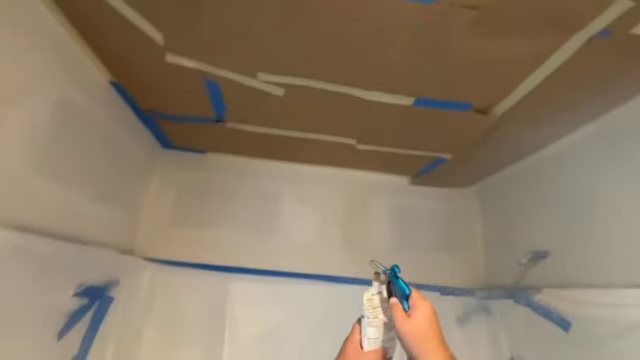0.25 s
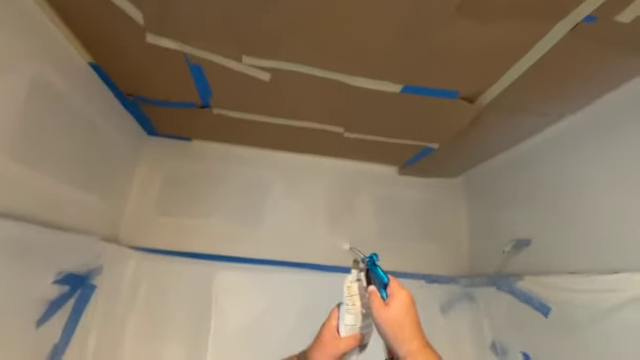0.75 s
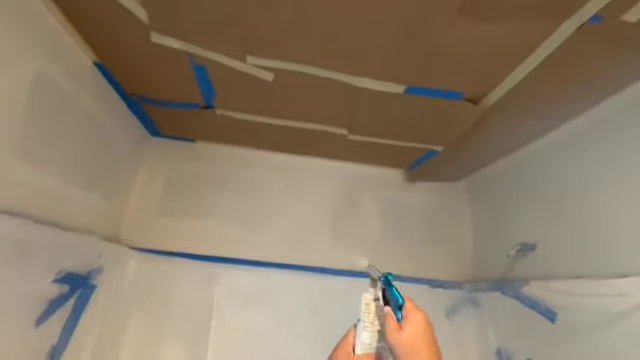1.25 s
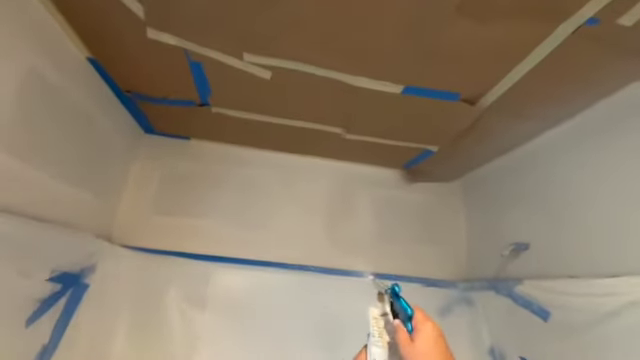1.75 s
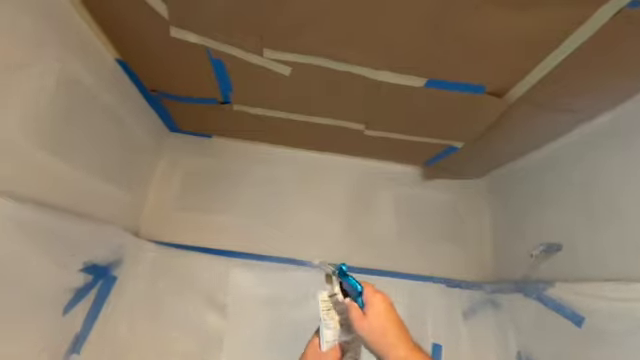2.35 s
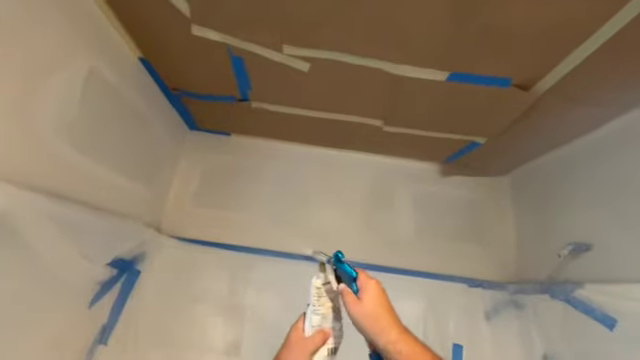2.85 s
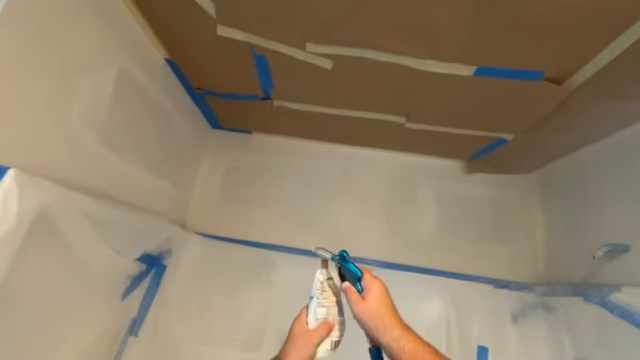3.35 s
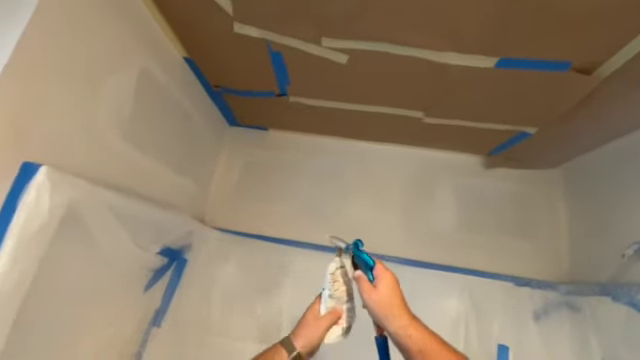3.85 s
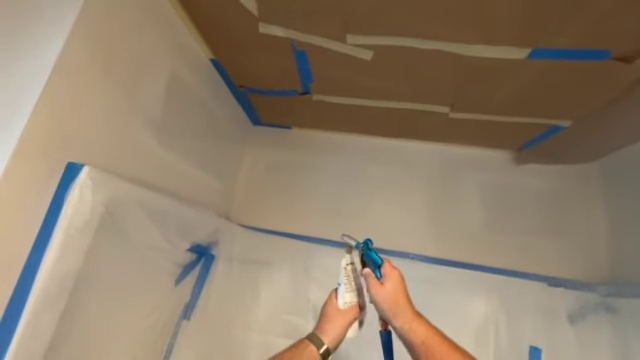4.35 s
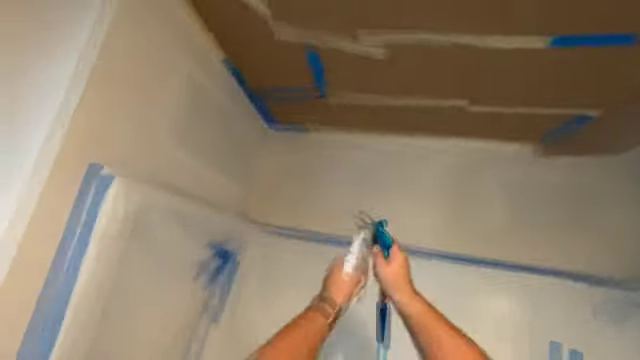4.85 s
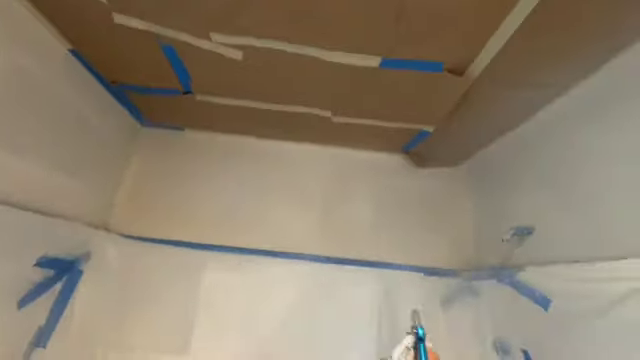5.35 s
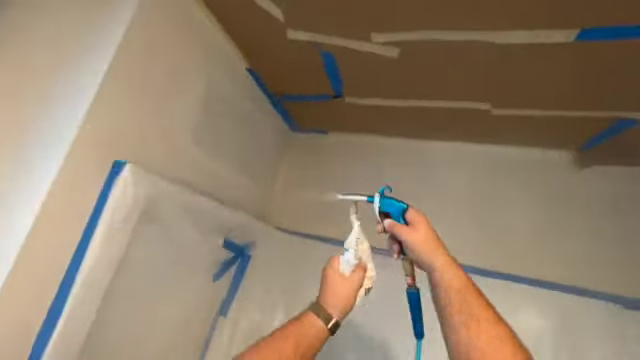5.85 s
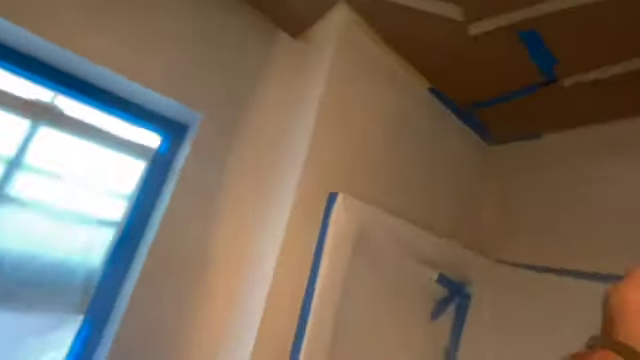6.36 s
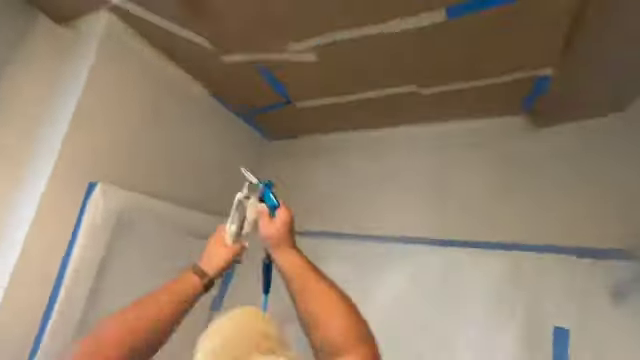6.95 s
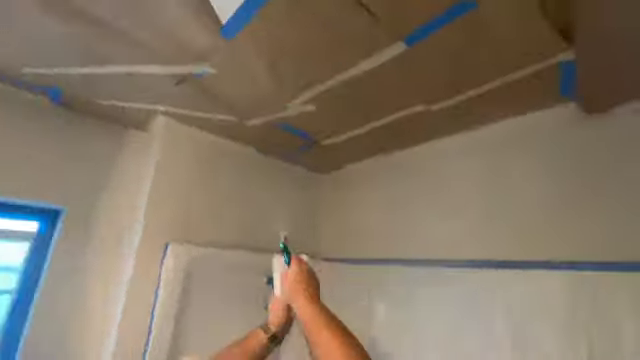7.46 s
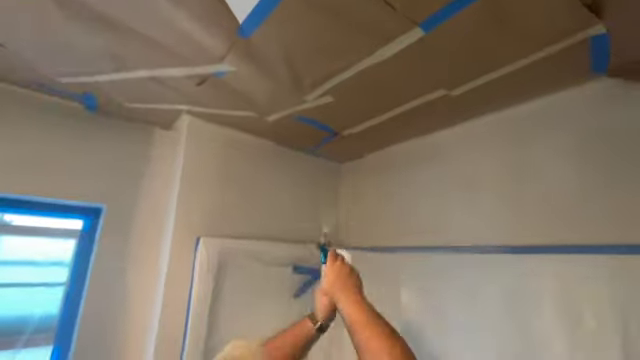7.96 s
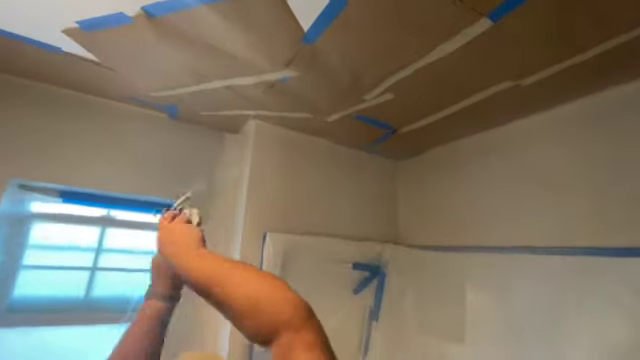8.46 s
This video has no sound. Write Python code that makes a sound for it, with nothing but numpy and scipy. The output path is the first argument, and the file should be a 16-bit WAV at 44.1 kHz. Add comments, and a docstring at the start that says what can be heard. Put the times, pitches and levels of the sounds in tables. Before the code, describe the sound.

Low compressor drone in a small bare room, then a loud wet spray blast with rasping spits, dissolving around five seconds into thin quiet hiss.

```python
"""In a small bare room a compressor drones from the start: unsteady crank partials over a noise rattle.
The air gun's trigger first leaks dull noise, then opens fully and blows wall texture: a bright jet of
noise, wet rasping spits and tiny ticks. Gain control clamps down on this blast and pushes the drone under it.
Around 5 s it all dissolves into the same work as if sped up about sevenfold: a thin, quiet noise hiss
with passing resonances over a steady rattle and a faint whine of sines; later the listening place moves."""
import sys
import numpy as np
from scipy import signal
from scipy.fft import rfft, irfft
from scipy.io import wavfile
from scipy.ndimage import uniform_filter1d

SR = 44100
rng = np.random.default_rng(int(sys.argv[2]) if len(sys.argv) > 2 else 0)


def materialize(psi):
    """Save the field psi as 16-bit PCM at rate SR to the path in sys.argv[1].

    A 1-D psi becomes a single channel; in a 2-D psi each row is a channel.
    """
    bounded = np.clip(np.atleast_2d(psi).T, -1, 1)
    quanta = np.round(bounded * 32767).astype(np.int16)
    wavfile.write(sys.argv[1], SR, quanta)


N = 384111

SIZE, HOP = 2048, 512  # short-time spectra, in samples
TIME = np.arange(N) / SR
FRAME_S = np.arange(N // HOP + 5) * HOP / SR
BIN_HZ = np.fft.rfftfreq(SIZE, 1 / SR)
FAST = 6.9  # how many times faster the sped-up work goes
DISSOLVE_START_S, DISSOLVE_END_S = 4.566, 5.19


def gain_of(db):
    """Decibels to amplitude."""
    return 10 ** (np.asarray(db) / 20)


def evened(x):
    """Scales to rms 1."""
    return x / np.sqrt(np.mean(x ** 2) + 1e-20)


def ramp(t, start_s, length_s):
    """Goes from 0 to 1 in a straight line."""
    return np.clip((t - start_s) / length_s, 0, 1)


def across(rows):
    """Reads every column of a colour table at each frequency bin, along a log-frequency axis."""
    hz, *columns = np.transpose(rows)
    return [np.interp(np.log(BIN_HZ + 1), np.log(hz), column) for column in columns]


def bump(centre_hz, octaves):
    """A bell on the log-frequency axis."""
    return np.exp(-.5 * (np.log2((BIN_HZ + 1) / centre_hz) / octaves) ** 2)


def lag(x, seconds):
    """One-pole smoothing."""
    r = np.exp(-1 / (seconds * SR))
    return signal.lfilter([1 - r], [1, -r], x)


def drift(rate):
    """Slow random wandering of rms 1, up to about the given rate in Hz."""
    hz = np.fft.rfftfreq(N, 1 / SR)
    slow = rfft(rng.standard_normal(N)) / (1 + (hz / rate) ** 4)
    return evened(irfft(slow, N))


def chance():
    """Random short-time spectra of power 1."""
    a, b = rng.standard_normal((2, len(FRAME_S), len(BIN_HZ)))
    return (a + 1j * b) / np.sqrt(2)


def flicker(count, size):
    """Random patches of rms 1, count frames long and size bins wide."""
    patches = rng.standard_normal((len(FRAME_S), len(BIN_HZ)))
    longer = uniform_filter1d(patches, count, 0)
    return evened(uniform_filter1d(longer, size, 1))


def paired(left, other, likeness):
    """Two channels with a given likeness."""
    same = np.clip(likeness, -1, 1)
    return np.array([left, same * left + np.sqrt(1 - same ** 2) * other])


def noise(field_db, likeness, balance_db, walls=np.zeros((2, 1, len(BIN_HZ))), early_share=0):
    """One noise source reaches left and right through early echoes; the rest is diffuse room sound."""
    early = chance() * paired(*walls, likeness)
    diffuse = paired(chance(), chance(), likeness)
    z = np.sqrt(early_share) * early + np.sqrt(1 - early_share) * diffuse
    lean = gain_of(balance_db) * np.ones(len(BIN_HZ))
    sides = np.array([lean, np.ones(len(BIN_HZ))]) / np.sqrt(1 + lean ** 2)
    z = z * sides[:, None] * gain_of(field_db)
    sound = signal.istft(z, nperseg=SIZE, noverlap=SIZE - HOP, time_axis=1, freq_axis=2)[1]
    return evened(sound[:, :N])


def echoes(longest_s, sway_s, rate, count):
    """Echoes off the bare walls comb the spectrum; the combs slide as the gun moves."""
    total = 0
    for place, speed, start, turn in rng.random((count, 4)):
        sway = np.sin(2 * np.pi * (rate * (.5 + speed) * FRAME_S + start))
        delay = longest_s * (.06 + place) + sway_s * sway
        angle = (2 * np.pi * (delay[:, None] * BIN_HZ + turn)).astype(np.float32)
        total = total + np.cos(angle) + 1j * np.sin(angle)
    return total / np.sqrt(count)


# Hollow resonances between jet, hands and corner that come, slide and go with the aim.
# A level below 0 is a cancellation.
# Columns: [start t/s, end t/s, first f/Hz, last f/Hz, level/dB]
HOLLOW_RESONANCES = [(.2, 1.7, 1150, 1216, 2), (.2, 2.27, 1503, 1465, 7), (.5, 2.7, 1880, 1915, 3),
                     (.4, 1.5, 540, 563, 4), (.2, 2.2, 3400, 3430, 4.5), (.2, 1.2, 4570, 4640, 6),
                     (1.0, 2.17, 2300, 2310, 4.5), (.2, 3.1, 6520, 6500, 9), (.2, 0.81, 9350, 9320, 7),
                     (2.0, 3.42, 1200, 1225, 9), (2.1, 2.54, 2400, 2325, 9), (1.798, 3.4, 6500, 6800, -3),
                     (2.25, 2.88, 3710, 3620, 7), (2.5, 3.65, 10400, 11700, 5.5), (2.9, 4.5, 2215, 2265, 9),
                     (3.05, 4.6, 3260, 3240, -2), (3.4, 4.08, 3730, 3740, 6.5), (3.0, 4.2, 1740, 1790, 3),
                     (3.15, 4.95, 1392, 1415, 9), (3.3, 4.9, 1260, 1270, -4.5), (3.9, 4.44, 2600, 2560, -4),
                     (4.0, 5.1, 2700, 2760, 1.5), (4.3, 5.1, 1110, 1080, 8), (4.3, 5.2, 10300, 10200, 5),
                     (5.4, 6.8, 3060, 3080, 5), (7.0, 11, 3830, 3860, 0), (7.2, 7.1, 10150, 10200, 7),
                     (7.3, 8.9, 13400, 13270, 5.5)]


def hollows(width_hz, fade_s, widening, flutter, wander):
    """Lift in dB from the passing resonances; they swell and wander with the unsteady hands."""
    lift_db = 0
    for start, end, first_hz, last_hz, db in HOLLOW_RESONANCES:
        wobble = rng.standard_normal((2, len(FRAME_S)))
        swell, sway = evened(uniform_filter1d(wobble, size=7, axis=1))
        inside_s = np.minimum(FRAME_S - start, end - FRAME_S)
        present = ramp(inside_s, 0, fade_s) * (1 + flutter * swell)
        glide_hz = np.interp(FRAME_S, [start, end], [first_hz, last_hz])
        hz = (glide_hz * (1 + wander * sway))[:, None]
        lift_db = lift_db + db * present[:, None] / (1 + (2 * (BIN_HZ - hz) / (width_hz + widening * hz)) ** 2)
    return lift_db


def partial(hz, db, phase, turn):
    """A machine partial: a sine that reaches left and right out of step by turn radians."""
    cycles = hz * TIME + rng.random()
    return np.sqrt(2) * gain_of(db) * np.sin(2 * np.pi * cycles + phase + np.array([[0], [turn]]))


# The compressor's hum on the multiples of its crank speed, before the common level DRONE_DB.
# Columns: [multiple of the crank speed, level/dB]
CRANK_PARTIALS = [(1, -33), (2, -36), (3, -25), (4, 2), (5, -21), (6, -11.5), (7, -22), (8, -18), (9, -11),
                  (10, -28), (11, -31), (12, -30), (13, -24), (14, -18), (15, -14), (16, -2), (17, -22),
                  (18, -13), (19, -14.5), (20, -11), (21, -12), (22, -6.5), (23, -16), (24, -30), (25, -20),
                  (26, -17.5), (27, -21), (28, -17.5), (29, -34), (30, -29), (31, -27), (32, -12.5),
                  (33, -12), (34, -23)]
# Standing waves lean the hum to one side.
# Columns: [f/Hz, left-right level/dB]
HUM_LEAN = [(53, 4), (80, 2), (120, -12), (212, -3), (290, -0.5), (435, -6.5)]
# Colour of the compressor's rattle, before its top and bottom are cut further.
# Columns: [f/Hz, relative level per Hz/dB]
RATTLE_COLOUR = [(18, -34), (30, -11), (60, -12), (81, -5), (124, -2), (153, -30), (215, -6.5), (293, -2),
                 (330, -20), (442, -7), (515, -14.5), (819, -18.5), (971, -17), (1800, -27.5), (2340, -58),
                 (3960, -115)]
CRANK_HZ, DRONE_DB = 13.28, -36


def compressor():
    """The pump's partials share one slightly unsteady crank, over a low rattle."""
    slip, lines = 0.014 * drift(6.1), 0  # slip in radians of the crank
    for multiple, db in CRANK_PARTIALS:
        hz = multiple * CRANK_HZ
        lean_db = np.interp(hz, *np.transpose(HUM_LEAN))
        line = partial(hz, DRONE_DB + db, multiple * slip, turn=0.18)
        lines = lines + line * gain_of([[lean_db / 2], [-lean_db / 2]])
    rattle_db = across(RATTLE_COLOUR)[0] - 30 * (BIN_HZ > 2000) - 18 * (BIN_HZ < 55)
    return lines + gain_of(-38.5) * noise(rattle_db, 0.35, -1.3)


# Sped-up compressor partials, heard from two places among the room's standing waves.
# Columns: [f/Hz, first level/dB, level just before the move/dB, level after it/dB]
WHINE_PARTIALS = [(366.2, -62.5, -59.5, -84), (736, -83, -83, -71), (832, -70, -73, -66.5),
                  (1465, -64, -64.5, -66), (1990, -67, -71, -80)]
MOVE_S, MOVE_LENGTH_S = 6.92, 0.13  # the listening place moves


def sped_up_whine():
    """The crank's hum at high speed is a thin whine, whose balance changes with the listening place."""
    moved, slip = ramp(TIME, MOVE_S, MOVE_LENGTH_S), drift(4.7)
    whine = 0
    for hz, first_db, before_db, after_db in WHINE_PARTIALS:
        here_db = np.interp(TIME, [DISSOLVE_END_S, MOVE_S], [first_db, before_db])
        size = (1 - moved) * gain_of(here_db) + moved * gain_of(after_db)
        whine = whine + size * partial(hz, 1.2 * drift(6.7), slip * hz / 1100, turn=0.43)
    return whine


# Colour of the sped-up hiss and rattle.
# Columns: [f/Hz, relative level per Hz/dB, left-right likeness, left-right level/dB]
THIN_HISS_COLOUR = [(30.0, -8, 0.63, 9), (130.0, -8, 0.57, 4.5), (280.0, -7, 0.43, 7), (604, -5, 0.46, 1.5),
                    (1150, -7, 0.33, 3.5), (1450, -4.5, 0.52, 0.5), (2620, -8, -0.027, 3),
                    (3520, -6.5, 0.1, 0), (5300, -5.5, -0.29, 1), (6800, -2.2, -0.011, 1.5),
                    (9700, -1, -0.11, 0.5), (11200, -1.5, -0.49, 0.5), (13300.0, -1.5, 0.068, 0),
                    (15500.0, -1.8, 0.3, 0)]
# Swells and lulls of the sped-up hiss.
# Columns: [peak t/s, approach t/s, return t/s, level/dB]
HISS_SWELLS = [(5.821, .2, .1, 0.3), (6.04, 0.071, 0.061, -1.5), (6.16, .05, 0.13, 2),
               (6.42, 0.33, 0.22, -2.5), (7.01, 0.29, 0.1, -4), (7.12, 0.19, 0.11, -6.5),
               (7.7, 0.76, .9, -0.3), (8.34, 0.15, .08, -3), (8.48, 0.1, .1, -3.5)]
THIN_DB, THIN_WAVER_DB, THIN_FLICKER_DB = -35.5, 0.8, 2.2
# the hiss gains presence as the gun works along to the window
PRESENCE_HZ, PRESENCE_DB, PRESENCE_FROM_S, PRESENCE_RISE_S = 5300, 3, 6.75, 0.28


def sped_up():
    """Sped up, the jet is a thin hiss with fleeting combs, over a steady rattle and a whine."""
    colour_db, likeness, balance_db = across(THIN_HISS_COLOUR)
    field_db = colour_db + hollows(width_hz=59, fade_s=0.24, widening=0.014, flutter=0.25, wander=.001)
    walls = [echoes(longest_s=.09 / FAST, sway_s=.00006, rate=.12 * FAST, count=22) for _ in range(2)]
    top = 1 / (1 + (2800 / (BIN_HZ + 1)) ** 4)  # the hiss takes the top, the rattle the rest
    presence = ramp(FRAME_S, PRESENCE_FROM_S, PRESENCE_RISE_S)[:, None]
    presence_db = PRESENCE_DB * presence * bump(PRESENCE_HZ, 0.22)
    hiss_db = field_db + presence_db + THIN_FLICKER_DB * flicker(count=3, size=4) + 10 * np.log10(top)
    hiss = noise(hiss_db, likeness, balance_db, walls, early_share=.7)
    swell_db = 0
    for peak_s, approach, back, db in HISS_SWELLS:
        swell_db = swell_db + np.interp(TIME, [peak_s - approach, peak_s, peak_s + back], [0, db, 0])
    hiss *= gain_of(THIN_DB + swell_db + THIN_WAVER_DB * drift(40))
    rattle = noise(field_db + 10 * np.log10(1 - top), likeness, balance_db)
    return hiss + gain_of(-53.5) * rattle + sped_up_whine()


# The feed of compound surges or starves.
# Columns: [peak t/s, rise t/s, fall t/s, level/dB, wet body level/dB]
FEED_SURGES = [(0.771, 0.094, 0.06, 1.5, 2.5), (.88, 0.2, 0.19, -2.5, 3), (1.055, 0.18, 0.02, 5.5, -3.5),
               (1.38, 0.41, 0.2, 2.5, -1.5), (1.76, 0.21, 0.4, 0, 0.5), (2.063, .03, 0.03, 1.5, 1.5),
               (2.68, 0.065, .12, -.3, 0.5), (2.849, .03, .2, -0.4, 3.5), (4.12, 0.24, 0.2, 3, 1.5),
               (4.34, 0.08, 0.23, 0.7, -6), (4.9, 0.21, 0.28, 0, 5.5)]


def feed(t):
    """What the surges add to the level and to the wet body, in dB."""
    total_db = 0
    for peak_s, rise, fall, db, body_db in FEED_SURGES:
        surge = np.interp(t, [peak_s - rise, peak_s, peak_s + fall], [0, 1, 0])
        total_db = total_db + np.outer([db, body_db], surge)
    return total_db


# the valve never quite shuts; a half-pressed trigger lets out a leak that sags
SHUT_DB = -56.5
LEAK_S, LEAK_RISE_S, LEAK_DB, LEAK_SAG_DB_PER_S = .11, 0.23, -34.5, 21.5
# the valve lifts off its seat, then snaps open
OPEN_S, CRACK_S = 0.5606, 0.023
SNAP_S, SNAP_LENGTH_S, SNAP_SHARE = .577, .007, .58
# the jet climbs to full strength as the trigger travels on, and sags slowly
FULL_DB, SAG_DB_PER_S, TRAVEL_DB, TRAVEL_S = 0.44, 0.74, 12.5, 0.15


def airflow():
    """Strength of the jet: shut, leaking, then wide open."""
    leak = ramp(TIME, LEAK_S, LEAK_RISE_S) * gain_of(LEAK_DB - LEAK_SAG_DB_PER_S * (TIME - LEAK_S))
    age = np.maximum(TIME - OPEN_S, 0)
    open_db = FULL_DB - SAG_DB_PER_S * age - TRAVEL_DB * np.exp(-age / TRAVEL_S) + feed(TIME)[0]
    snap = 1 - SNAP_SHARE + SNAP_SHARE * ramp(TIME, SNAP_S, SNAP_LENGTH_S)
    blast = ramp(TIME, OPEN_S, CRACK_S) * snap * gain_of(open_db)
    return np.sqrt(gain_of(SHUT_DB) ** 2 + leak ** 2 + blast ** 2)


LEAK_BODY_DB, LEAK_FIZZ_DB = 7, -8.5
# the wet body thins as the compound runs down; a surge of compound damps the dry fizz (dB per dB)
BODY_DB, DRYING_DB_PER_S, FIZZ_DB, FIZZ_DAMPING = 0.2, 1.5, 1, 0.76


def tone():
    """Wet body and dry fizz in dB: the leak is dull, the open jet bright and drying with time."""
    surge_db, wet_db = feed(FRAME_S)
    opened = ramp(FRAME_S, OPEN_S, CRACK_S)
    body_db = BODY_DB - DRYING_DB_PER_S * (FRAME_S - OPEN_S) + wet_db
    fizz_db = FIZZ_DB - FIZZ_DAMPING * surge_db
    return opened * body_db + (1 - opened) * LEAK_BODY_DB, opened * fizz_db + (1 - opened) * LEAK_FIZZ_DB


def sputter(per_s, decay_s):
    """Droplets tear off at random: each a sudden rise and a short fall; evened to rms 1 around 0."""
    drops = rng.exponential(1, N) * (rng.random(N) < per_s / SR)
    envelope = lag(drops, decay_s)
    return evened(envelope - envelope.mean())


def spatter(per_s, spread_db):
    """Tiny ticks of droplets landing on the wall, heard a little differently left and right."""
    sizes = gain_of(spread_db * np.minimum(rng.exponential(1, N), 4))
    ticks = sizes * (rng.random(N) < per_s / SR)
    kind, t = rng.integers(0, 12, N), np.arange(96) / SR
    shapes = rng.standard_normal((12, 2, len(t))) * np.exp(-t / .0005)  # short noise bursts
    out = 0
    for k, shape in enumerate(shapes):
        out = out + signal.oaconvolve((ticks * (kind == k))[None], shape, axes=1)[:, :N]
    band = signal.butter(3, [1000, 11000], "band", fs=SR, output="sos")
    return evened(signal.sosfilt(band, out))


# Separate lumps of compound spitting through the nozzle; levels are relative to the rasp.
# Columns: [t/s, level/dB, decay t/s]
LUMP_SPITS = [(.588, -6, 0.019), (.620, -13, 0.006), (.653, -8, .01), (1.053, -5.5, 0.0039),
              (2.064, -16, 0.0089), (2.563, -2, 0.012), (2.835, -4, .014), (2.875, -12, 0.0097),
              (3.211, -5, 0.0084), (3.256, -3, 0.009), (3.446, -4, .01), (3.983, -5.5, .01),
              (4.118, -12, .01), (4.247, -1, 0.0086), (4.389, -4, 0.007), (4.477, -2, 0.0099),
              (4.534, 3, 0.01), (4.614, -0.5, .009), (4.646, -2, 0.0087), (4.707, -0.5, 0.016),
              (4.797, -11, .01), (4.885, -1, 0.012), (4.92, -2, 0.011)]
SPIT_RISE_S = .002


def spits():
    """Strength of the separate spits: each bursts out at once and dies quickly."""
    total = 0
    for start, db, decay_s in LUMP_SPITS:
        burst = ramp(TIME, start, SPIT_RISE_S) * np.exp(-abs(TIME - start) / decay_s)
        total = total + gain_of(db) * burst
    return total


# Colour of the jet, before body, fizz, resonances and flicker.
# Columns: [f/Hz, relative level per Hz/dB, left-right likeness, left-right level/dB]
SPRAY_COLOUR = [(148, -27, 0.78, -5), (527, -10.5, 0.19, -1.5), (650, -10.5, -0.056, 1.5),
                (840, -7.5, -0.1, 2), (1150, -3, 0.48, 2.5), (1690, -4.5, -0.18, -0.5),
                (2300, -4, 0.44, -0.3), (3620, -2.5, 0.014, 0.5), (5380, -2.9, 0.25, 2),
                (6140, -0.3, 0.096, 7), (7280, -0.5, -0.21, 4), (8400, -2.1, -0.47, 3),
                (10250, -2.2, 0.41, -1.5), (11700, -5.5, 1, 1.5), (12800, -10, 0.59, -2),
                (13400, -12.5, -1.04, 0.5)]
JET_FLICKER_DB = 2  # eddies make the jet's colour flicker
SPIT_HZ, SPIT_SKIRT_DB = 2180, 27  # a spit is a broad, grainy splutter, weaker away from its centre


def spray():
    """Turbulent air, coloured by the walls and roughened by the compound that it tears apart."""
    colour_db, likeness, balance_db = across(SPRAY_COLOUR)
    body_db, fizz_db = (level[:, None] for level in tone())
    ring_db = hollows(width_hz=34, fade_s=0.22, widening=.011, flutter=.25, wander=.002)
    tone_db = body_db * bump(1150, 1.0) + fizz_db * bump(17000, 0.61)
    field_db = colour_db + tone_db + ring_db + JET_FLICKER_DB * flicker(count=4, size=5)
    walls = [echoes(longest_s=.03, sway_s=.00012, rate=.3, count=36) for _ in range(2)]
    early_share = .88 * BIN_HZ / (BIN_HZ + 250)
    air = noise(field_db, likeness, balance_db, walls, early_share)
    air *= gain_of(.6 * sputter(per_s=130, decay_s=.005))
    # wet lumps rasp lower than the air does: a steady patter of small ones, and the separate spits
    rasp_db = colour_db + ring_db - SPIT_SKIRT_DB * (1 - bump(SPIT_HZ, 1.84))
    rasp = noise(rasp_db, likeness, balance_db, walls, early_share)
    rasp *= gain_of(1.1 * sputter(per_s=450, decay_s=.0015))
    patter = gain_of(-17.5 + 3.7 * np.minimum(sputter(per_s=90, decay_s=.005), 2.2))
    ticks = gain_of(-25.0) * spatter(per_s=470, spread_db=1.5)
    return airflow() * (air + (patter + spits()) * rasp + ticks)


def gain_control(x, threshold_db, depth_db, attack_s, creep_s, quick_share):
    """Loud treble turns the whole sound down by up to depth_db: most of it quickly, the rest slowly."""
    treble = signal.sosfilt(signal.butter(2, 1500, "high", fs=SR, output="sos"), x)
    power_db = 10 * np.log10(lag((treble ** 2).mean(0), 0.0013) + 1e-12)
    over_db = np.clip(power_db - threshold_db, 0, depth_db)
    cut_db = quick_share * lag(over_db, attack_s) + (1 - quick_share) * lag(over_db, creep_s)
    return x / gain_of(cut_db)


def scene():
    """The spraying at its own speed dissolves into the sped-up spraying."""
    work = gain_control(spray() + compressor(), threshold_db=-26.5, depth_db=24,
                        attack_s=0.05, creep_s=1.0, quick_share=0.79)
    blend = np.interp(TIME, [DISSOLVE_START_S, DISSOLVE_END_S], [0, 1])
    return (1 - blend) * work + np.sqrt(blend) * sped_up()


def record(dry):
    """Cuts off everything above the band limit of 15850 Hz."""
    low_pass = signal.firwin(511, 15850, window=("kaiser", 9), fs=SR)
    return signal.oaconvolve(dry, low_pass[None], "same")


dry = scene()
out = record(dry)
materialize(out)
```